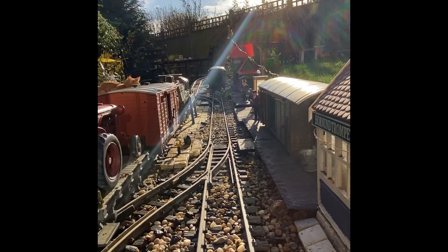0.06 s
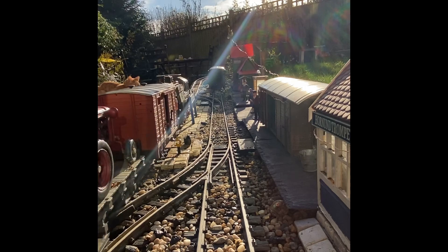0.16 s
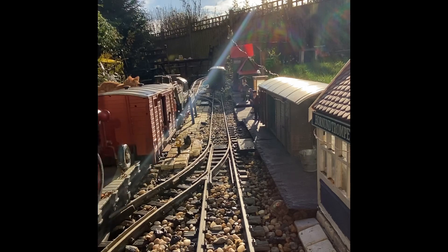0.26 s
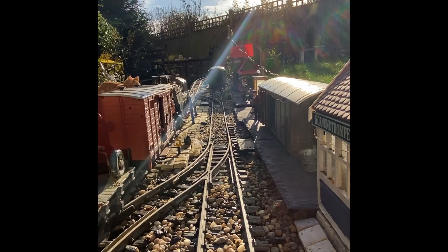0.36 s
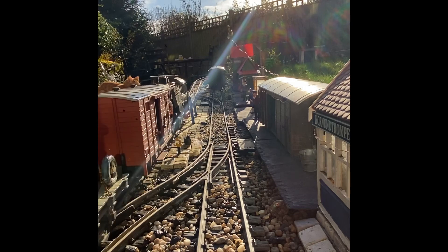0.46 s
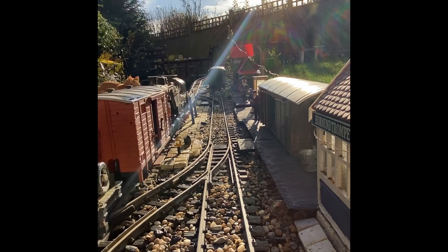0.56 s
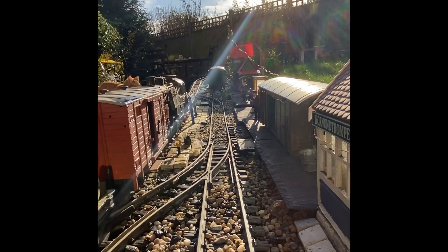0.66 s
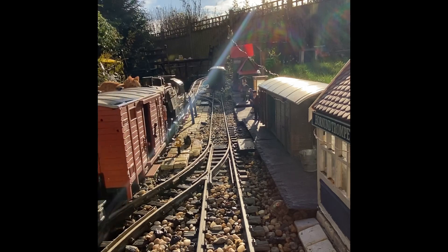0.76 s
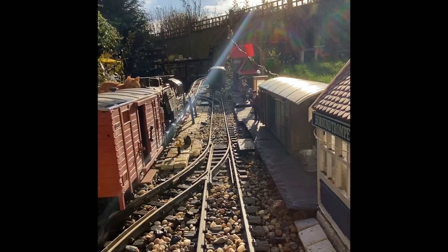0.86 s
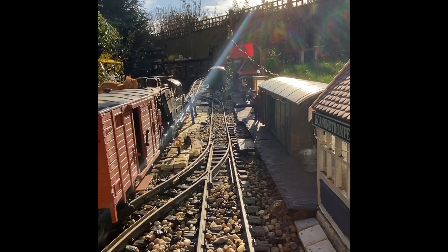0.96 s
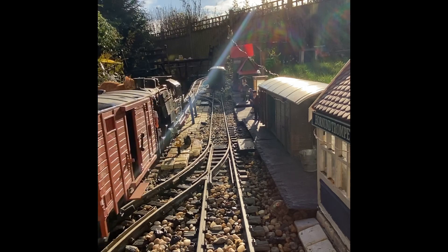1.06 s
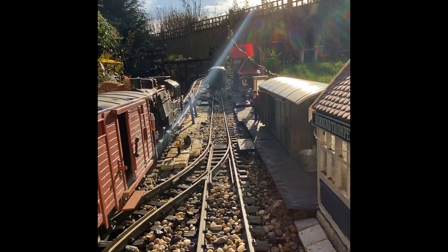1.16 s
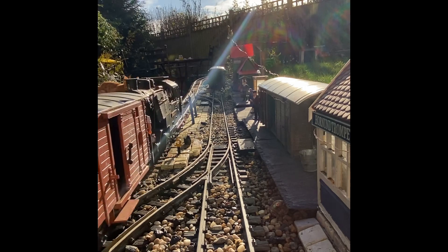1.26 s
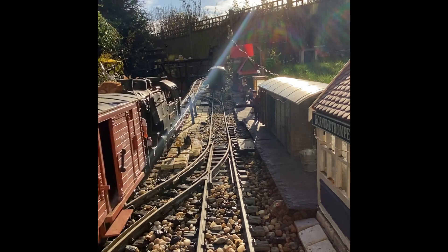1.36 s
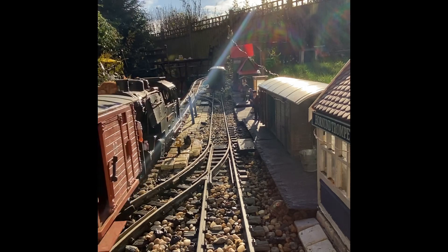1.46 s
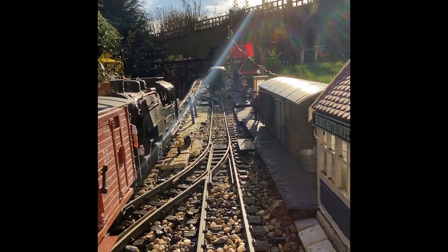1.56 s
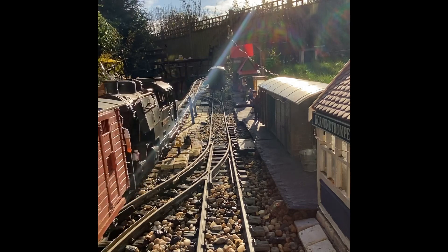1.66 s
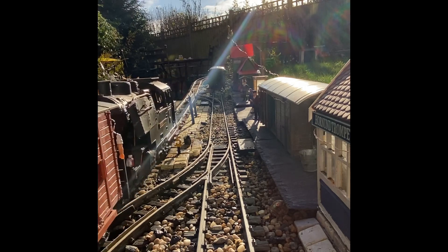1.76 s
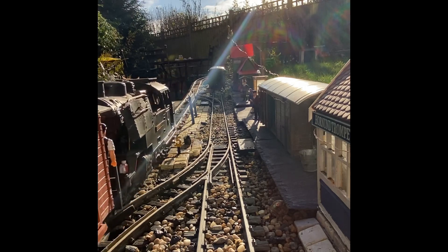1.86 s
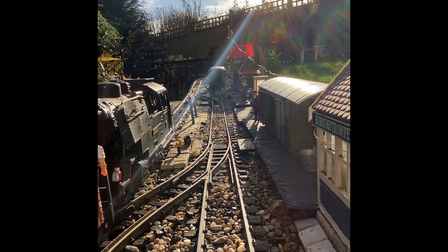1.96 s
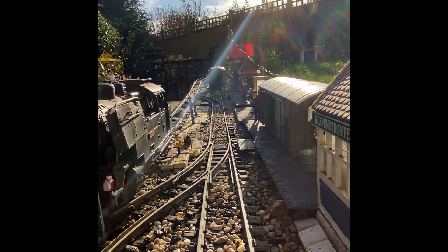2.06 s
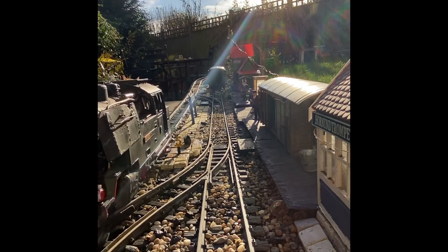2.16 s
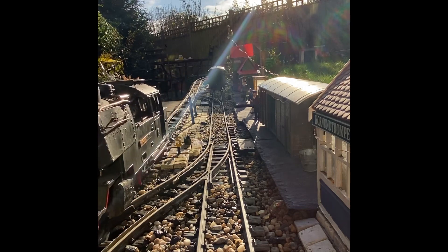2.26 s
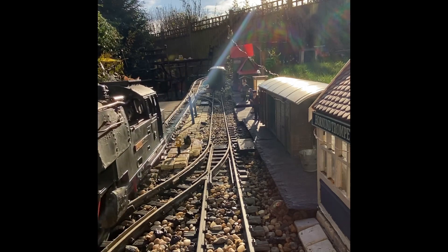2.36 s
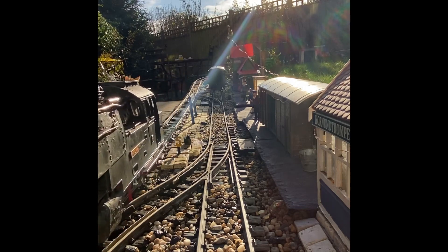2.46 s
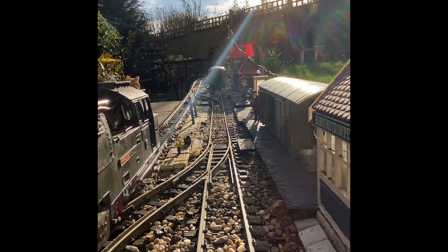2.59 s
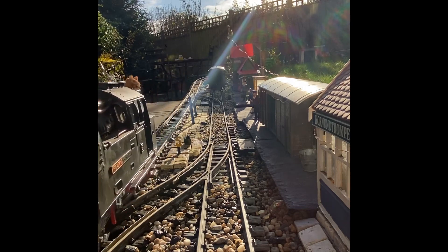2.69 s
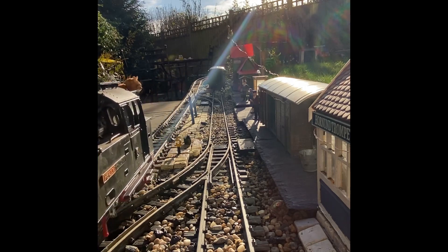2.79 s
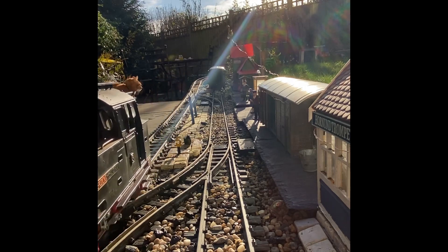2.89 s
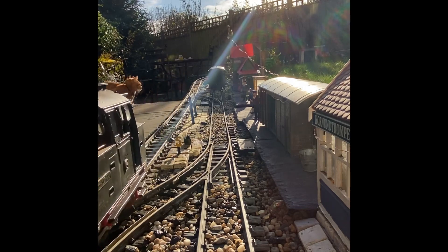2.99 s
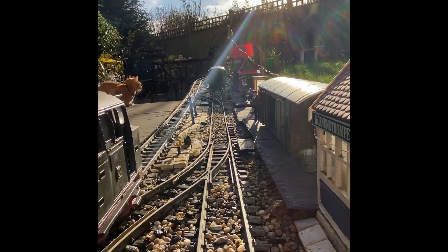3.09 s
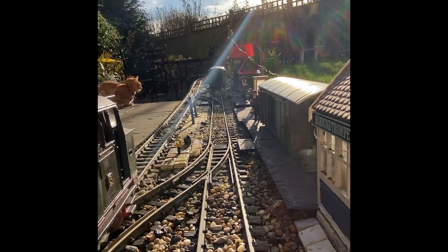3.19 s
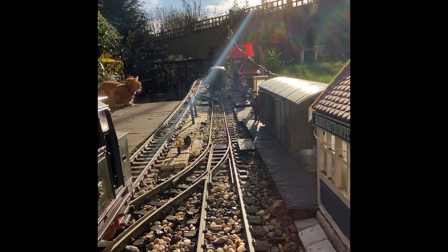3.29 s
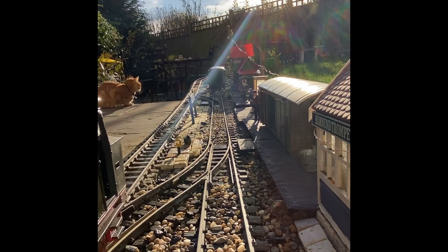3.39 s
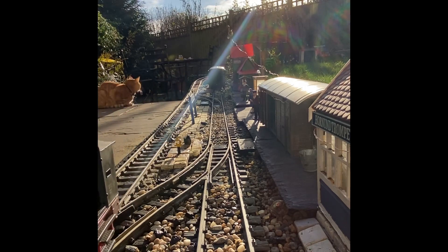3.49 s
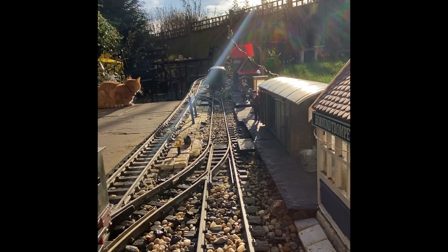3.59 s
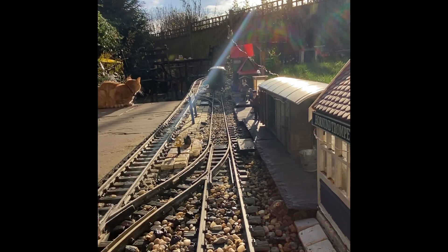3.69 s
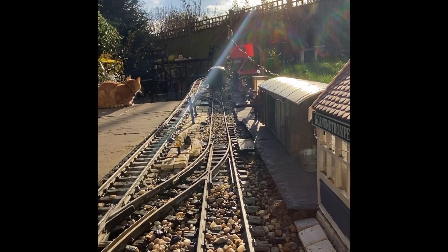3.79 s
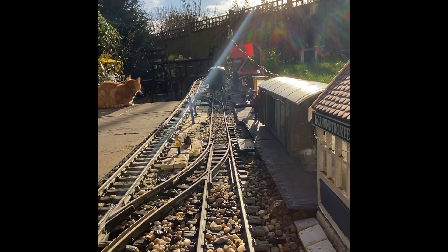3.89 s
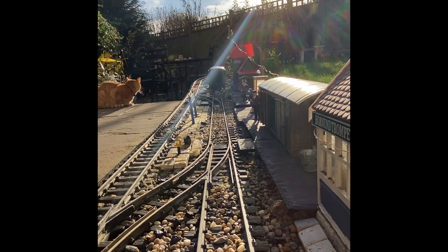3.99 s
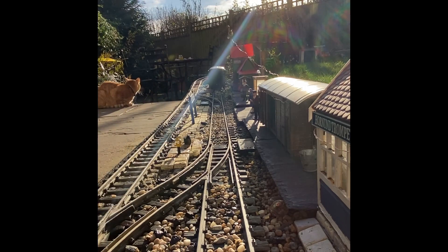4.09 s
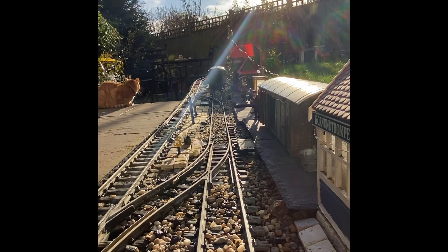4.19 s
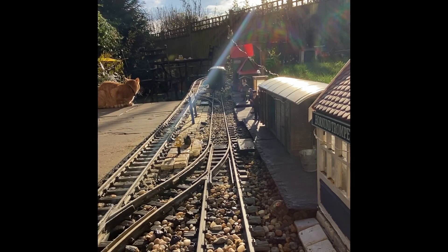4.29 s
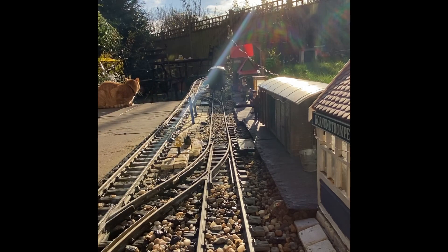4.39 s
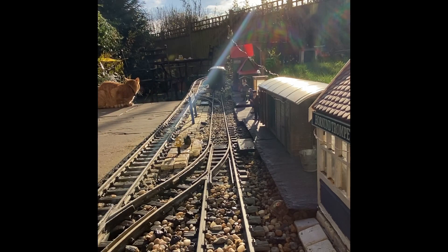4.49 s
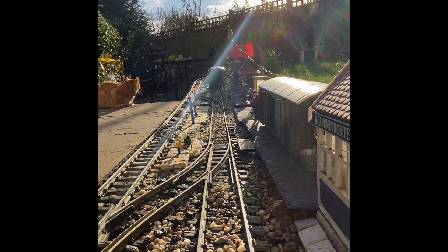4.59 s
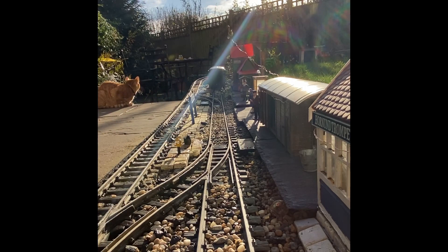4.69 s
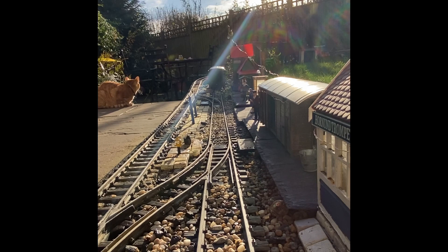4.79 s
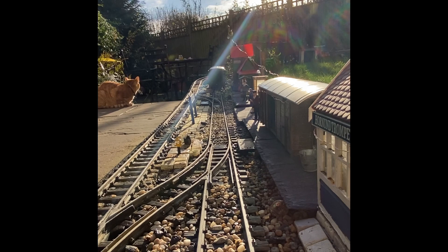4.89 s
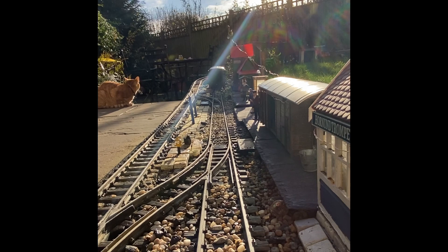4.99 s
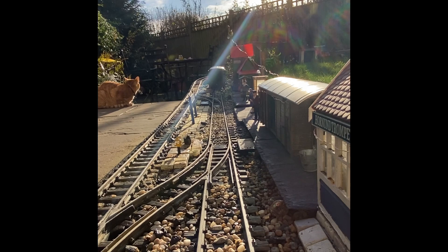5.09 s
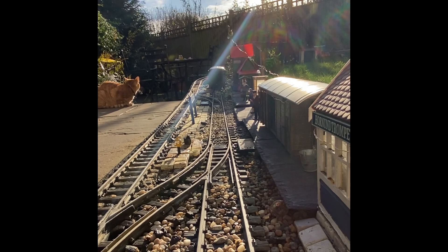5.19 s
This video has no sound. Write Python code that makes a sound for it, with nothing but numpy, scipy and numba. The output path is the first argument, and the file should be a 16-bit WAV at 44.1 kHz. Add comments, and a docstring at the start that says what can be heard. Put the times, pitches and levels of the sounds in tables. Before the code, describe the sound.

A small garden model train is already rolling at the start, close on the left of a microphone lying by the rails. Its hollow wagon bodies rumble and knock, the wheels hiss on the rail and the couplings chatter finely. Wheels click and briefly ring over joints and points at uneven intervals. Until about 2 seconds a flat spot ticks nearly three times a second, growing fainter. Underneath, the axles and track bed rumble and a motor hums softly, while a low drone fades out by about 1.5 seconds. The train is loudest from around 1.5 to 3.5 seconds, with clusters of clicks near 2.5 and 3 seconds, another near 4, and a few soft low thuds. From about 4 seconds it draws away and gets quieter. Light wind buffets the microphone at the start, around 3 seconds and at the end, near 5 seconds.

```python
"""A small garden train rolls past on the left of a phone lying by the rails, then draws away.
Rough wheels shake the hollow wagon bodies and jolts make them knock. Wheels click and ring over joints
and points, a flat spot ticks each turn, couplings chatter, and the wheels hiss on the rail.
Underneath, axles and track bed rumble, a motor hums and a low drone fades,
while light wind touches the two microphone ports."""
import sys
import numpy as np
from scipy import signal
from scipy.fft import rfft, irfft
from scipy.io import wavfile
from scipy.ndimage import uniform_filter1d
from numba import njit

SR = 44100
rng = np.random.default_rng(int(sys.argv[2]) if len(sys.argv) > 2 else 0)


def generate_wav(signal):
    """Clip the signal to [-1, 1] and save it as 16-bit WAV at the path in sys.argv[1]."""
    frames = np.transpose(np.atleast_2d(signal))
    scaled = np.clip(frames, -1, 1) * 32767
    pcm = np.round(scaled).astype(np.int16)
    wavfile.write(sys.argv[1], SR, pcm)


N = 231348

# fader ride of the rolling train: t/s, wagon box level/dB, wheel hiss level/dB
ROLL_LEVELS = [(0.0, -44.5, -54), (0.2, -43, -54.5), (0.4, -43.5, -58), (0.62, -41.5, -56.5),
               (0.8, -43.5, -56), (1.02, -43, -54.5), (1.07, -39.5, -59), (1.11, -42, -53.5),
               (1.3, -40, -57), (1.4, -43.5, -57.5), (1.63, -36.5, -55.5), (1.68, -43, -60),
               (1.74, -40.5, -60.5), (1.8, -39.5, -57.5), (1.84, -40.5, -57), (1.9, -40.5, -58),
               (2.0, -39, -56), (2.12, -43, -59), (2.2, -40, -62.5), (2.31, -43, -58.5), (2.45, -39, -55.5),
               (2.72, -40.5, -57.5), (2.79, -39.5, -60), (2.82, -41.5, -58), (2.92, -37.5, -60),
               (3.02, -38, -53), (3.17, -41, -56), (3.27, -42.5, -57.5), (3.48, -38.5, -54),
               (3.67, -45.5, -57.5), (3.72, -42, -58.5), (3.8, -45, -59.5), (4.0, -44, -56),
               (4.1, -45, -59.5), (4.3, -43.5, -57), (4.6, -45.5, -57.5), (4.72, -48, -60.5),
               (4.98, -48.5, -63.5), (5.25, -54.5, -62)]
# the mix as wagons, then the engine, go by: t/s, lids over boxes/dB, frames over boxes/dB,
# track bed level/dB, fine hiss over hiss/dB, wagon pan to the left/dB
PASS_MIX = [(0, -5, -3, -45.5, -10, 9), (.55, -3, -4.5, -47.5, -13, 7), (.7, -2, -2.5, -47, -12, 7),
            (.9, -2.5, -1, -47, -13, 8), (1.3, -1.5, -9, -45.5, -11, 7),
            (1.9, -8.5, -8.5, -44.5, -10.5, 6.5), (2.3, -4.5, -12.5, -41, -9.5, 8),
            (2.6, -4.5, -13.5, -42.5, -6.5, 7), (3.0, -5, -19, -43.5, -5.5, 6.5),
            (3.4, -7.5, -23.5, -42, -8.5, 6), (3.8, -7, -13.5, -45, -5, 7), (4.3, -7, -16, -46, -9, 6),
            (4.75, -6, -18, -48, -10.5, 4.5), (5.25, -4.5, -14.5, -55, -11.5, 4.5)]
# pitch bend of boxes and lids during the pass: t/s, ratio
BODY_BEND = [(0, 0.99), (1.0, 0.97), (1.65, 1.015), (2.0, 0.99), (2.4, 0.93), (2.8, 0.95), (3.6, 0.992),
             (4.4, 0.93), (5.25, 0.91)]
# wind puffs at their peaks: t/s, level/dB
WIND_PUFFS = [(0.05, -40), (.4, -42.5), (1.1, -57), (3.03, -44), (3.55, -48), (3.87, -53), (4.15, -52),
              (4.55, -55), (5.17, -44)]
# fader rides of the motor hum and the axle rumble: t/s, level/dB
HUM_LEVEL = [(0, -53.5), (.26, -52.5), (.95, -51.5), (1.3, -55.5), (2.1, -51.5), (2.6, -52.5), (3.8, -55.5),
             (4.15, -52), (4.7, -54), (5.25, -53)]
AXLE_RUMBLE_LEVEL = [(0.0, -49), (0.16, -50.5), (2.82, -44), (2.92, -64), (3.02, -45), (3.13, -49),
                     (3.26, -47), (3.52, -64), (4.0, -58), (4.5, -63), (5.25, -63.5)]

# resonances of the track bed and the train's parts: f/Hz, width/Hz, gain/dB
BED_MODES = [(75.4, 31, -7.5), (92, 36.6, 5), (348, 210, -5.5)]
AXLE_MODES = [(132.5, 55, 0)]
WHEEL_MODES = [(5860, 3000, 3)]
FRAME_MODES = [(1020, 310, 5.5), (1790, 550, -0.5)]
LID_MODES = [(679, 55, 3), (770, 114, 1), (935, 145, -1)]
BOX_MODES = [(415, 70, 0.5), (470, 60, 1.5), (525, 55, 4), (625, 120, -3.5)]
# EQ of the wheel hiss and of its fine, airy top: f/Hz, gain/dB
HISS_EQ = [(1500, -0.5), (2100, 1), (2900, 6), (3400, 4.5), (3800, 2.5), (4500, 2.5), (5300, 1.5),
           (6200, -1), (7000, 1), (8300, -14), (10000, -40)]
FINE_HISS_EQ = [(7000, -79), (9000, 6.5), (12000, 1), (14500, 1), (15500, -10), (16300, -30)]

# axles dropping into joints, felt through the ground: t/s, relative level/dB, f/Hz
AXLE_DROPS = [(1.841, -31.5, 90), (2.188, -34, 91.5), (2.476, -44, 104), (2.649, -41, 96), (2.775, -34, 94),
              (3.029, -33, 104), (3.904, -36, 88), (4.061, -38, 75.4), (4.159, -31, 67.3),
              (4.419, -36, 105), (4.613, -39, 64.6), (4.704, -32.5, 70.6), (4.739, -46, 67.3)]
# small ticks of wheels and underframes: t/s, relative level/dB, f/Hz
DRY_TICKS = [(0.1447, -38, 1050), (0.26, -30, 1300), (0.431, -26, 1410), (0.55, -31, 1300),
             (0.7084, -35, 1430), (0.7538, -41, 1510), (0.888, -33, 1000), (0.9484, -30, 1230),
             (1.162, -31, 1500), (1.5914, -32, 1400), (2.168, -32, 1100), (2.4794, -36, 1000),
             (2.5154, -36, 1140), (2.5577, -28, 1000), (2.6011, -38, 1050), (3.1768, -42, 1500),
             (3.485, -33, 1220), (3.6557, -38, 1130), (3.7296, -38, 1150), (4.032, -38, 1170),
             (4.5385, -37, 1070)]
# wheels left ringing: t/s, level/dB, f/Hz
WHEEL_RINGS = [(1.041, -38, 3870), (1.132, -30, 1680), (1.5627, -42, 3650), (1.878, -42, 3650),
               (2.05, -44, 3780), (2.5122, -31, 1710), (2.5136, -37, 3790), (2.516, -28, 1320),
               (2.556, -31, 893), (2.7576, -49, 2340), (2.995, -29.5, 1720), (3.051, -43, 3100),
               (3.485, -43, 2520), (3.486, -34, 1193), (3.5, -32, 1270), (4.0238, -40, 2175),
               (4.0237, -34, 5530), (4.026, -41, 4080), (4.0305, -42, 5670), (4.032, -33, 1210),
               (4.0454, -41, 2250), (4.278, -45, 2650), (4.4962, -43.5, 2200), (4.5374, -40, 1730),
               (4.538, -48, 5530)]
# wheels over joints: t/s, relative level/dB, ping f/Hz, clack trim/dB, snap trim/dB, sizzle trim/dB
JOINT_HITS = [(0.0777, -29, 4440, -13, -3, 0), (0.0874, -31, 3070, -19, -7, -4),
              (0.1054, -40, 3500, -1, -6, -7), (0.2533, -42, 2040, 5, -4, -9),
              (0.2984, -38, 2720, -3, -16, -22), (0.335, -38.5, 3850, -16, -24, -10),
              (0.3824, -38, 2980, -17, -11, -27), (0.458, -41, 3600, -17, -7, -6),
              (0.7295, -45, 4340, 4, -12, -3), (0.775, -53, 4500, -12, -12, 3),
              (0.9031, -41, 2660, -5, -22, -24), (1.0437, -32.5, 3740, -11, -25, -14),
              (1.1341, -33.5, 2080, -5, -26, -30), (1.162, -41.5, 2760, -14, -10, -2),
              (1.24, -40.5, 3390, -17, -29, -27), (1.343, -43, 4600, -7, -21, -4),
              (1.4499, -43.5, 2990, 4, -17, -20), (1.5632, -31, 3830, -14, -25, -12),
              (1.8775, -34, 3380, -16, -35, -30), (2.4028, -37, 4230, -17, -31, -12),
              (2.422, -37, 3400, -19, -29, -29), (2.46, -43, 3300, -1, -22, -15),
              (2.4795, -38.5, 2950, 0, -28, -26), (2.492, -38, 2850, -13, -19, -20),
              (2.516, -37.5, 3580, 5.5, -8, -29), (2.5563, -33.5, 2840, -5, -27, -8),
              (2.601, -54, 2600, 3, -15, -20), (2.758, -35.5, 2280, -13, -12, -28),
              (2.7907, -48.5, 2580, 1, 4, -19), (2.878, -45, 2800, -8, -15, -16),
              (2.9382, -50, 3270, -5, 8.5, -11), (2.9677, -39, 3060, -4, -8, -3),
              (2.9933, -31, 2720, -11, -9, -15), (3.024, -42.5, 3330, -2, -14, 3.5),
              (3.0519, -36, 3220, -21, -21, -24), (3.096, -45, 2600, -2, -20, -20),
              (3.1366, -32, 2950, -11, 1, -1), (3.1767, -42, 2900, 0, -21, -19),
              (3.22, -43, 2770, -12, -21, -20), (3.269, -42.5, 3350, -16, 3.5, -11),
              (3.4833, -33.5, 2410, -12, -6, -30), (3.4988, -37.5, 3030, 0, -8, -14),
              (3.552, -48, 3700, -7, -15, -20), (3.918, -43, 3020, -12, -16, -21),
              (3.9775, -45, 2320, -5, 4, -4), (3.9923, -42, 3120, -4, -5, -20),
              (4.0238, -31.5, 2200, -14, -6, -24), (4.0288, -41, 3920, 0, -14, -26),
              (4.0448, -38, 2210, -11, -10, -9), (4.155, -43.5, 3040, -6, -9, -4),
              (4.3083, -40, 2660, -10, 6, -7), (4.4637, -41, 2800, -16, -25, -28),
              (4.5375, -35.5, 2330, -5, -12, -40), (4.5912, -43, 3070, -17, 2, -3),
              (4.866, -46, 2180, -1, -25, -22)]
# a flat spot striking once a turn, fainter as it rolls off: t/s, relative level/dB, ping f/Hz
FLAT_SPOT_HITS = [(0.1814, -29, 4040), (0.5553, -30.5, 4130), (0.93, -32, 3740), (1.304, -33, 3130),
                  (1.677, -37.5, 3400), (2.049, -44, 3750)]
# jolts to the wagon bodies: t/s, relative level/dB, f/Hz
BODY_JOLTS = [(0.214, -25, 520), (0.281, -42, 527), (0.429, -47, 570), (0.677, -20, 590), (0.731, -27, 550),
              (0.74, -25, 490), (0.779, -27, 600), (1.048, -29, 540), (1.065, -25.5, 567), (1.09, -27, 470),
              (1.123, -23, 680), (1.167, -23.5, 690), (1.266, -25.5, 550), (1.294, -25, 405),
              (1.347, -20.5, 510), (1.45, -32, 610), (1.468, -23, 540), (1.512, -24, 450),
              (1.616, -23, 556), (1.749, -24, 544), (1.792, -31, 566), (1.82, -30, 610), (1.88, -19, 505),
              (1.889, -24, 567), (1.93, -23.5, 460), (2.009, -39, 556), (2.042, -21, 527),
              (2.106, -26, 513), (2.119, -24.5, 487), (2.15, -23.5, 414), (2.225, -26.5, 430),
              (2.267, -20.5, 810), (2.473, -31, 436), (2.555, -19.5, 540), (2.657, -30, 620),
              (2.783, -17.5, 554), (2.866, -24, 630), (2.898, -28, 560), (3.021, -28, 470),
              (3.15, -24, 446), (3.179, -25.5, 370), (3.242, -26.5, 606), (3.332, -24.5, 610),
              (3.488, -24, 427), (3.502, -21.5, 613), (3.725, -27, 605), (3.777, -27.5, 596),
              (4.027, -25, 525), (4.078, -29.5, 536), (4.197, -30, 430), (4.299, -30, 513),
              (4.468, -32, 560), (4.573, -27, 495), (4.621, -28, 540), (4.747, -37, 510), (4.866, -35, 567)]

# phase by which the left port leads the right: f/Hz, phase/rad
LEFT_LEAD = [(0, 0), (690, 0.1), (1460, -1.0), (2840, -6.6), (3270, -7.0), (4740, -7.5), (5250, -6.1),
             (7320, -9.2), (8870, -9.6), (11800, -12.5), (14200, -12.6), (15000, -13.5), (15400, -15.3),
             (16100, -15.5)]
# tone balance of the two ports: f/Hz, left over right/dB
LEFT_BIAS = [(60, 1), (200, 2.5), (1300, -5), (2400, 0.5), (4400, -0.3), (15000, 0)]
# EQ of the spread-out wheels, which give the stereo width: f/Hz, gain/dB
SPREAD_EQ = [(100, -20.5), (300, -22), (640, 2.5), (1400, 2), (3000, -1.5), (6000, -10), (9000, -10),
             (15000, -15)]


def undb(db):
    """Decibels to linear gain."""
    return 10 ** (np.asarray(db) / 20)


def unit(x):
    """Normalise to an RMS of 1."""
    return x / np.sqrt(np.mean(x ** 2))


def curves(rows):
    """Automation lanes from a time table: one per column, one value per sample."""
    times, *columns = np.transpose(rows)
    return [np.interp(np.arange(N) / SR, times, column) for column in columns]


def per_bin(rows):
    """A frequency table read at every spectral bin, on a log axis."""
    hz, value = np.transpose(rows)
    return np.interp(np.log(np.arange(N // 2 + 1) * SR / N + 1), np.log(hz + 1), value)


def colour(x, eq):
    """Apply an EQ curve and normalise."""
    return unit(irfft(rfft(x) * undb(per_bin(eq)), N))


@njit
def sweep_filter(x, hz, width):
    """State-variable band-pass, gain 1 at a centre that may move every sample."""
    y, band, low = np.empty(len(x)), 0., 0.
    for i in range(len(x)):
        g, damping = np.tan(np.pi * hz[i] / SR), width / hz[i]
        v = (band + g * (x[i] - low)) / (1 + g * (g + damping))
        band, low, y[i] = 2 * v - band, low + 2 * g * v, damping * v
    return y


def bandpass(x, hz, width):
    """One resonance, with a steady or moving centre."""
    return sweep_filter(x, hz * np.ones(len(x)), float(width))


def resonate(x, modes):
    """Parallel resonances, signs alternating so the valleys stay filled."""
    return sum((-1) ** k * undb(db) * np.array([bandpass(row, hz, width) for row in x])
               for k, (hz, width, db) in enumerate(modes))


def wander(rate):
    """Smooth random modulation, `rate` steps a second, with a spread near 1."""
    hold = int(SR / rate)
    steps = np.repeat(rng.standard_normal(N // hold + 1), hold)
    return 1.244 * uniform_filter1d(uniform_filter1d(steps, hold), hold)[:N]


def noise():
    """White noise in two rows; train layers use them as near wheels and spread-out wheels."""
    return rng.standard_normal((2, N))


def grit(rate, scatter_db, smooth_db):
    """Tiny uneven bumps on wheel and rail, `rate` a second, over a smooth roughness."""
    size = undb(scatter_db * np.minimum(rng.exponential(size=N), 3))
    bumps = (rng.random(N) < rate / SR) * size * noise()
    return unit(unit(bumps) + undb(smooth_db) * noise())


def bursts(times, db, t60_s, rise_s):
    """Percussive envelope: a quick attack at each time, then a 60 dB decay."""
    out = np.zeros(N)
    for start, gain in zip(times, undb(db)):
        i = int(start * SR)
        t = np.arange(min(int(t60_s * SR), N - i)) / SR
        out[i:i + len(t)] += gain * (1 - np.exp(-t / rise_s)) * 1000 ** (-t / t60_s)
    return out


def pings(excitation, times, pitches, width_hz):
    """Each stretch between two onsets passes a steep resonance of its own pitch."""
    out = np.zeros((2, N))
    edges = np.append((times * SR).astype(int), N)
    for start, end, hz in zip(edges[:-1], edges[1:], pitches):
        mode = [(hz, width_hz, 0)]
        padded = np.pad(excitation[:, start:end], ((0, 0), (0, SR // 100)))
        ping = resonate(resonate(padded, mode), mode)[:, :N - start]
        out[:, start:start + ping.shape[1]] += ping
    return out


def struck_tones(hits, t60_s, rise_s, samples):
    """One decaying sine for each hit."""
    out = np.zeros(N)
    for start, db, hz in hits:
        i = int(start * SR)
        t = np.arange(min(samples, N - i)) / SR
        envelope = undb(db) * (1 - np.exp(-t / rise_s)) * 1000 ** (-t / t60_s)
        out[i:i + len(t)] += envelope * np.sin(2 * np.pi * hz * t)
    return out


def wind():
    """Low buffeting swells around each puff, opposite on the two ports, over a steady shared rumble."""
    buffet, shared = resonate(resonate(noise(), [(57.3, 31, 0)]), [(62.0, 44, 0)])
    t = np.arange(N) / SR
    calm_db, slope_db_per_s = -59, 74
    swell = undb(calm_db) + sum(undb(db - slope_db_per_s * np.abs(t - peak)) for peak, db in WIND_PUFFS)
    puffs = unit(buffet) * swell * undb(2.5 * wander(12))
    return puffs * [[1], [-1]] + unit(bandpass(shared, 36.0, 22.0)) * undb(-52)


def drone():
    """A low wavering note fades and dissolves into a dull, uneven rumble."""
    t = np.arange(N) / SR
    hz = 47.4 + 1.5 * wander(7.1)
    hold_s, fade_db_per_s = 0.68, 24
    note_db = -40.5 - fade_db_per_s * np.maximum(t - hold_s, 0) + 1.9 * wander(13)
    note = np.sqrt(2) * np.sin(2 * np.pi * np.cumsum(hz) / SR) * undb(note_db)
    sub_noise = bandpass(bandpass(rng.standard_normal(N), 46.0, 18.0), 46.0, 18.0)
    rumble = unit(sub_noise) * undb(-65.5 + 3.4 * wander(4))
    note_share = np.clip((1.4 - t) / 0.35, 0, 1)
    return (note_share * note + (1 - note_share) * rumble) * [[1], [0]]


def motor_hum():
    """A motor tone wavers and sinks in and out of the rumble."""
    hz = 194.3 + 2.8 * wander(14)
    level_db = curves(HUM_LEVEL)[0] + 1.8 * wander(25)
    return np.sqrt(2) * np.sin(2 * np.pi * np.cumsum(hz) / SR) * undb(level_db) * [[1], [0]]


def track_bed():
    """The track bed rumbles under the rolling train."""
    return unit(resonate(noise(), BED_MODES)) * undb(curves(PASS_MIX)[2] + .5 * wander(6))


def axle_rumble():
    """Low-end weight, strongest while the loaded axles roll by."""
    return unit(resonate(noise(), AXLE_MODES)) * undb(curves(AXLE_RUMBLE_LEVEL)[0] + .5 * wander(5))


def ground_thuds():
    """The track bed gives a few low swings after an axle drops into a joint."""
    return 2 * struck_tones(AXLE_DROPS, t60_s=0.14, rise_s=0.017, samples=8192) * [[1], [0]]


def wheel_hiss():
    """The contact of wheel and rail hisses and rattles finely; the treble flickers."""
    hiss_db, fine_db = curves(ROLL_LEVELS)[1], curves(PASS_MIX)[3]
    bumps = np.abs(grit(130, 6.9, -18.5)[0])
    rattle = 1 + 0.41 * unit(uniform_filter1d(bumps, size=90))
    flicker_db = 1.5 * wander(25)
    hiss = colour(noise() * rattle, HISS_EQ) * undb(hiss_db + flicker_db + 1.2 * wander(30))
    air = colour(noise() * np.sqrt(rattle), FINE_HISS_EQ)
    return hiss + air * undb(hiss_db + fine_db + 2.1 * flicker_db + 0.67 * wander(24.6))


def coupling_chatter(ticks_per_s=150):
    """Couplings and flanges tick at random times and pitches, riding the level of the hiss."""
    count = int(ticks_per_s * N / SR)
    jitter, size, pitch = rng.random((count, 3)).T
    times = (np.arange(count) + jitter) / ticks_per_s
    size_db = -3.5 * np.log(size + 0.028)
    scrape = noise() * bursts(times, size_db, t60_s=.012, rise_s=0.0031)
    return pings(scrape, times, 1800 * 4.7 ** pitch, width_hz=350) * undb(curves(ROLL_LEVELS)[1] + 16.5)


def dry_ticks():
    """Wheels and underframes give short, dry midrange rattles, each on its own pitch."""
    times, db, hz = np.transpose(DRY_TICKS)
    scrape = noise() * bursts(times, db, t60_s=0.013, rise_s=0.00069) * [[1], [.5]]
    return pings(scrape, times, hz, width_hz=570) * undb(17.5)


def wheel_rings():
    """A struck wheel rings on for a moment with a clear tone."""
    return struck_tones(WHEEL_RINGS, t60_s=0.055, rise_s=0.0015, samples=4096) * [[1], [.4]]


def wheel_clicks(t60_s=0.031):
    """Joints and the flat spot strike: the wheel pings, the frame clacks, snap and sizzle sit on top."""
    flat_trims_db = (-12, -10.5, -2.7)  # clack, snap, sizzle
    hits = sorted(JOINT_HITS + [(*hit, *flat_trims_db) for hit in FLAT_SPOT_HITS])
    times, db, hz, clack_db, snap_db, sizzle_db = np.transpose(hits)
    ping = noise() * bursts(times, db, t60_s, rise_s=0.00091)
    clack = noise() * bursts(times, db + clack_db, 1.25 * t60_s, rise_s=0.0043)
    snap = noise() * bursts(times, db + snap_db, 0.96 * t60_s, rise_s=0.00018)
    sizzle = noise() * bursts(times, db + sizzle_db, 0.89 * t60_s, rise_s=0.00032)
    top_band = [(9300, 10800, 1.24)]
    return (pings(ping, times, hz, width_hz=2300) * undb(8)
            + resonate(clack, FRAME_MODES) * undb(16)
            + resonate(snap, WHEEL_MODES) * undb(4)
            + resonate(resonate(sizzle, top_band), top_band))


def underframes():
    """Wheel roughness makes the underframes grind in the midrange."""
    grind = unit(resonate(grit(600, 3.2, 2.), FRAME_MODES))
    return grind * undb(curves(ROLL_LEVELS)[0] + curves(PASS_MIX)[1] + 2.2 * wander(15))


def passing_bodies(roughness, modes, drift, swell_db, changes_per_s=11):
    """Resonances of many wagons in turn: each wanders in pitch and swells on its own."""
    pitch = curves(BODY_BEND)[0]
    out = np.zeros((2, N))
    for k, (hz, width, db) in enumerate(modes):
        bend = pitch + drift * wander(changes_per_s)
        gain = undb(db + swell_db * wander(changes_per_s))
        out += (-1) ** k * gain * np.array([bandpass(row, hz * bend, width) for row in roughness])
    return unit(out)


def wagons():
    """Wheel roughness drives the hollow boxes and their lids; sharp jolts set one wagon ringing."""
    box_db, lid_db = curves(ROLL_LEVELS)[0], curves(PASS_MIX)[0]
    boxes = passing_bodies(grit(300, 1.9, 7.2), BOX_MODES, drift=.028, swell_db=.8)
    boxes *= undb(box_db + 1.1 * wander(30))
    lids = passing_bodies(grit(300, 1.4, 6.6), LID_MODES, drift=.022, swell_db=.7)
    lids *= undb(box_db + lid_db + wander(25))
    times, db, hz = np.transpose(BODY_JOLTS)
    jolts = bursts(times, db, t60_s=.004, rise_s=0.00063) * [[1], [.25]]
    box_thumps = pings(jolts, times, hz, width_hz=133) * undb(23.5)
    lid_knocks = resonate(jolts, LID_MODES) * undb(16.5)
    return boxes + lids + box_thumps + lid_knocks


def to_stereo(x, balance_db=0, spread_db=0):
    """Near wheels are the mid, spread-out wheels the side; the two ports hear them with a lag."""
    tilt = undb(balance_db / 2) * np.exp(.5j * per_bin(LEFT_LEAD))
    near, spread = rfft(x)
    spread = spread * undb(per_bin(SPREAD_EQ) + spread_db)
    return irfft(np.array([tilt * (near + spread), (near - spread) / tilt]), N)


def scene():
    """Wagons and underframes sit to the left, over the wheel sounds, the low end and the wind."""
    pan_db = curves(PASS_MIX)[4]
    sides_db = np.array([pan_db, -pan_db]) / 2
    bodies = to_stereo(wagons(), spread_db=-10) * undb(sides_db)
    frames = to_stereo(underframes(), spread_db=-6.5) * undb(0.67 * sides_db)
    rolling = track_bed() + wheel_hiss() + axle_rumble()
    clatter = wheel_clicks() + wheel_rings() + coupling_chatter()
    low_end = motor_hum() + drone() + ground_thuds()
    backing = to_stereo(rolling + clatter + low_end + dry_ticks(), balance_db=per_bin(LEFT_BIAS))
    return bodies + frames + backing + wind()


def record(dry):
    """The phone cuts the deepest bass and the very top."""
    low_cut = signal.butter(2, 36, "highpass", fs=SR, output="sos")
    high_cut = signal.ellip(8, .2, 70, 16300, fs=SR, output="sos")
    return signal.sosfilt(high_cut, signal.sosfilt(low_cut, dry))


dry = scene()
out = record(dry)
generate_wav(out)
```